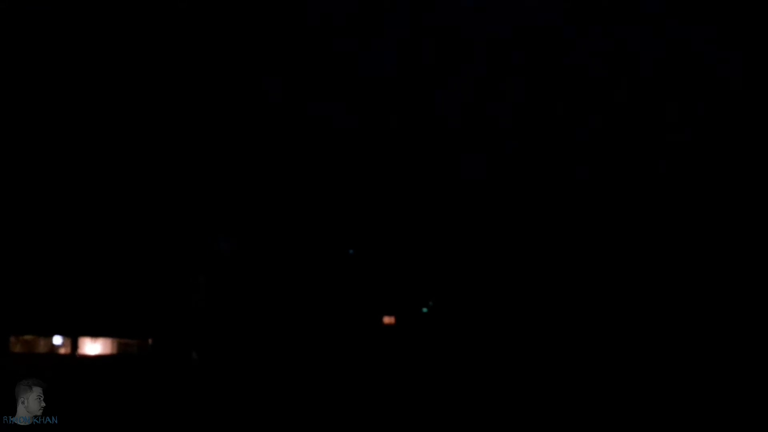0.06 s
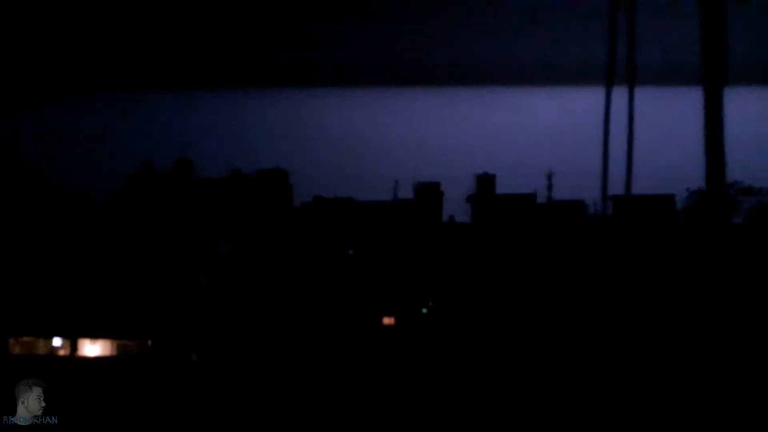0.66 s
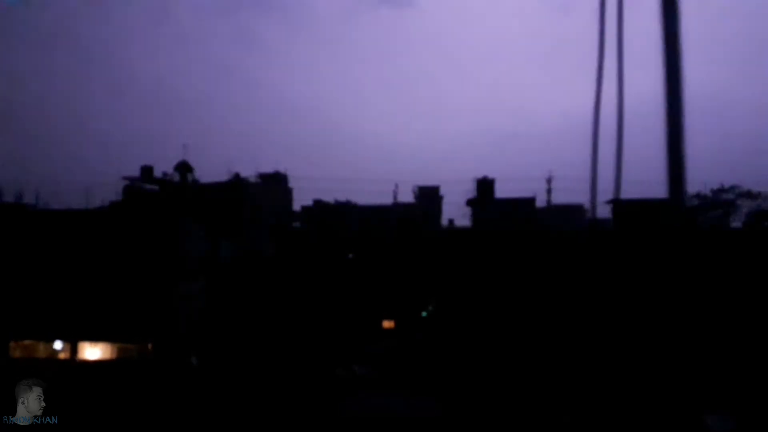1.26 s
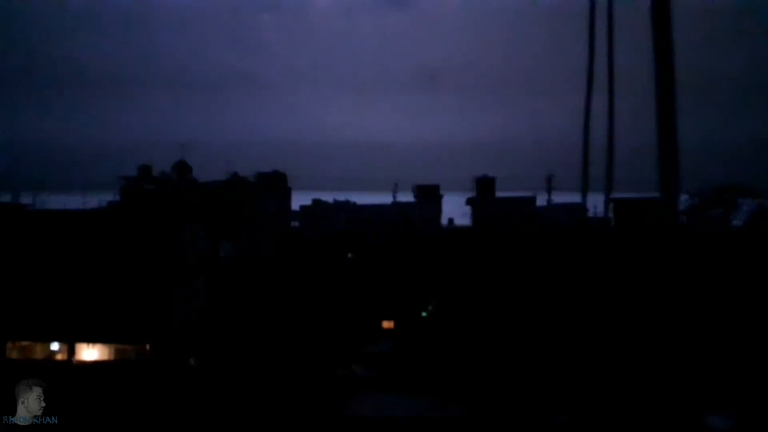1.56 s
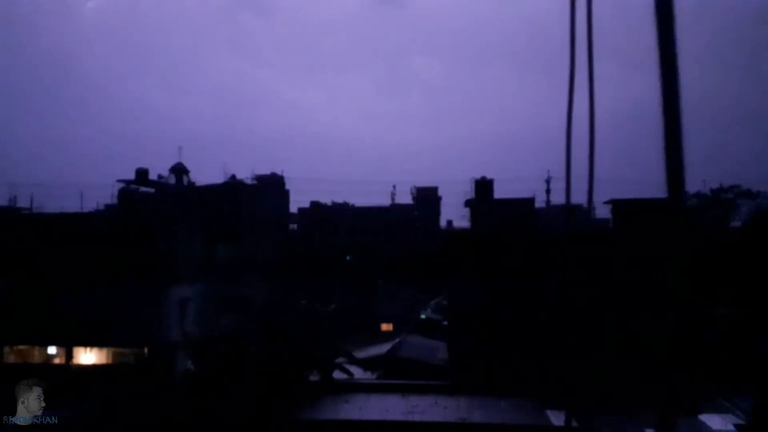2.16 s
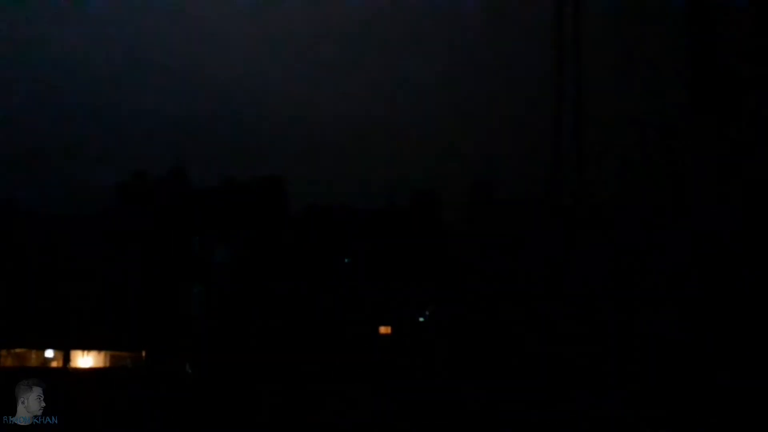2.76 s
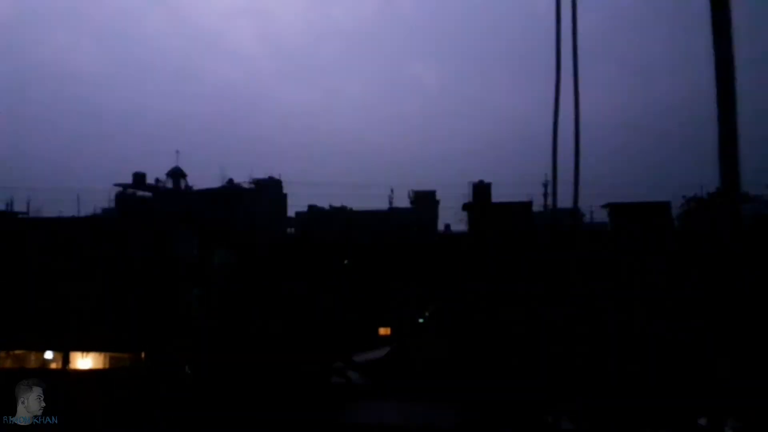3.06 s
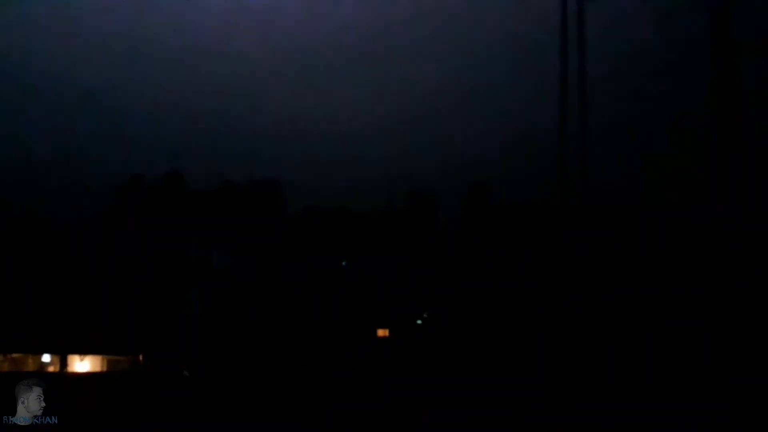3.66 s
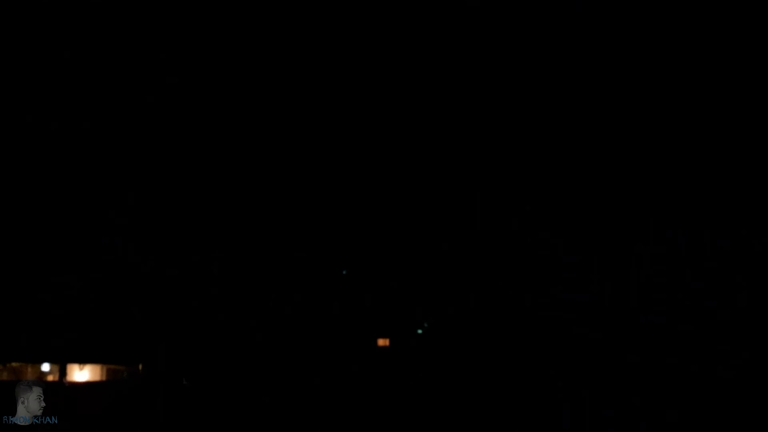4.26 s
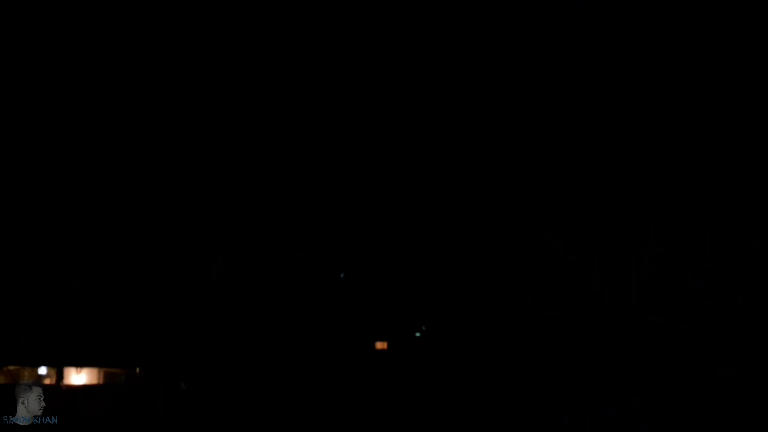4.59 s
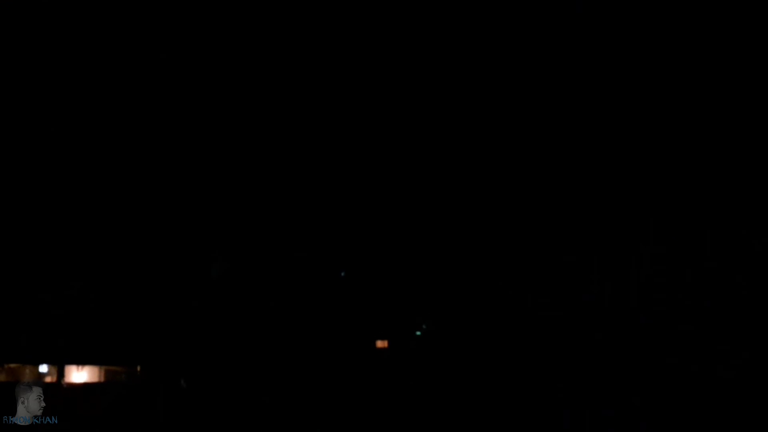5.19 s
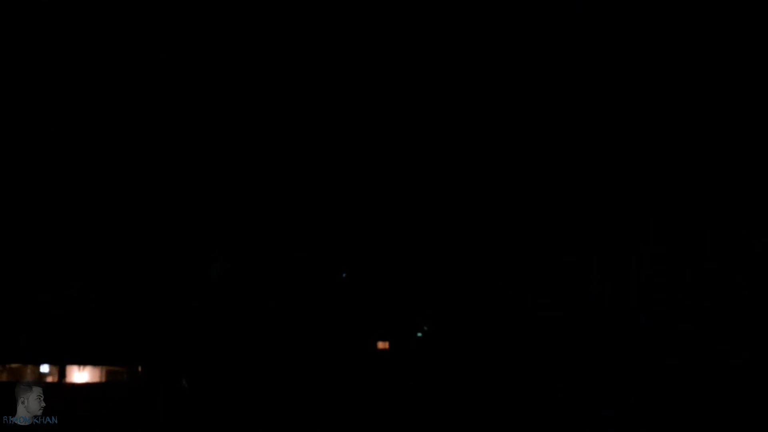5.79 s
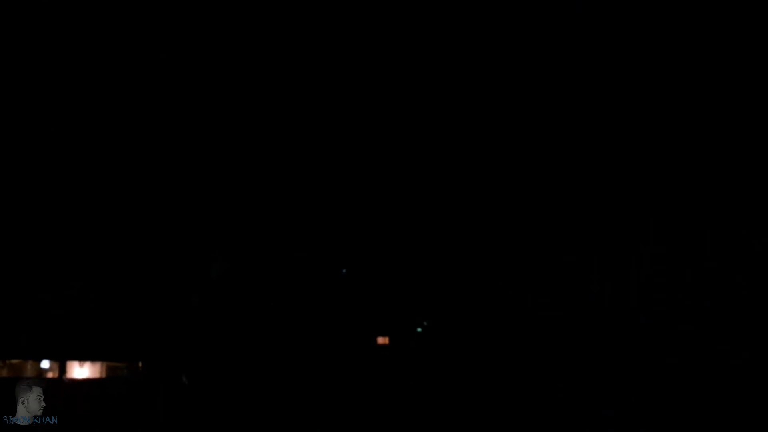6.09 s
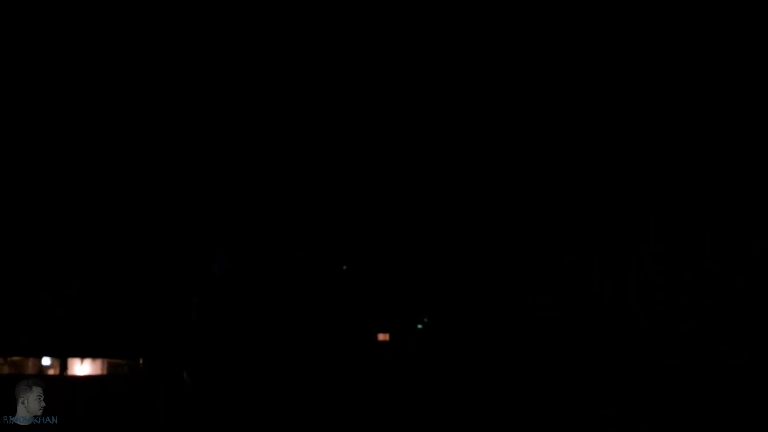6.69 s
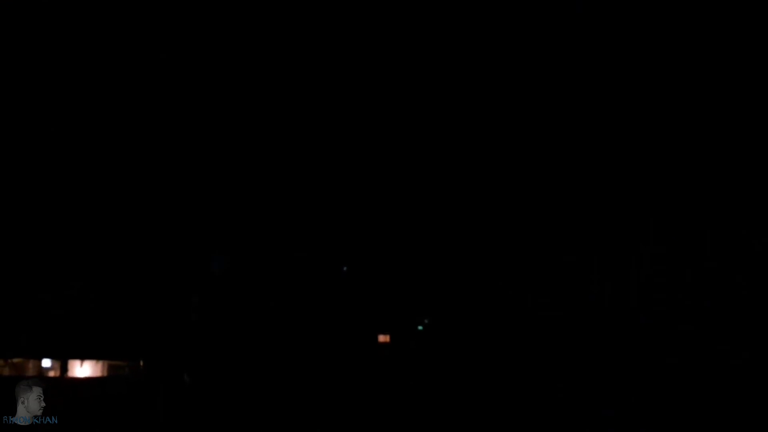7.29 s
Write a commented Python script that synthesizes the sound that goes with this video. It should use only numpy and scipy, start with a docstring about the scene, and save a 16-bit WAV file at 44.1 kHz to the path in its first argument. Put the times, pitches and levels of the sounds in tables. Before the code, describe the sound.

A faint, low murmur of a town at night opens the scene, with a small tick right at the start. At about 1 second close thunder begins as a tearing crackle full of sharp cracks. At 1.9 seconds the loudest clap hits, briefly overloading the small microphone with a rough fizz and a short dip in volume. Heavy booms and crackling follow densely until about 4 seconds, with quick, slightly hollow echoes off the houses. A thin, bright tick comes just before 4 seconds. The thunder then rolls on as a rumble with softer thuds, growing duller and clearly weaker after 6 seconds. At about 6.9 seconds a deep, steady hum sets in with hiss. Between 7 and 7.4 seconds come a few dry clicks, some hollow, the strongest near 7.2 seconds, and one very faint high peep.

```python
"""A town at night, where lightning strikes close to a small microphone that overloads.
Shock waves from the lightning's crooked path arrive as a tearing crackle, then as heavy booms and a
long roll, duller the further they have come. A limiter turns the sound down after the loudest booms.
There are short dry clicks and ticks, and two faint peeps. Near the end a deep hum sets in, with hiss."""
import sys
import numpy as np
from scipy import signal
from scipy.fft import rfft, irfft
from scipy.io import wavfile
from scipy.ndimage import uniform_filter1d

SR = 44100
rng = np.random.default_rng(int(sys.argv[2]) if len(sys.argv) > 2 else 0)


def write(x):
    x = np.atleast_2d(x).T
    wavfile.write(sys.argv[1], SR, np.round(np.clip(x, -1, 1) * 32767).astype(np.int16))

N = 323694
TIME = np.arange(N) / SR
THUNDER_START_S = .977

# Tone colours: how strong the low and high parts of a sound are.
# Each row: frequency in Hz, relative level in dB.
TOWN_TONE = [(20, -17), (60, 0), (110, 0.5), (200, -11.5), (400, -24.5), (900, -29.5), (1900, -29),
             (3200, -45), (5000, -54), (7000, -66), (10000, -50.5), (15000, -32)]
CLICK_TONE = [(100, -42), (600, 17), (1500, 9), (3300, 5.5), (5500, -8), (8500, -12), (10500, -0.5),
              (16000, 15.5)]
SHELL_PUSH_TONE = [(100, -16), (600, 3.5), (3300, 1.5), (4300, -6), (5000, -12), (16000, -39)]  # the push that sets a hollow shell ringing
CRACKLE_TONE = [(20, -29), (80, -10.5), (140, 5), (250, -4.5), (550, -2.5), (780, -5.5), (1100, -6.5),
                (1500, -7), (2000, -6.5), (2800, -13), (3750, -11), (4400, -19), (5200, -22), (7200, -47.5),
                (9000, -87.5)]
RUMBLE_TONE = [(15, -40), (40, -20), (80, -14.5), (130, 0.5), (190, -5.5), (270, -2), (380, -6), (600, -9),
               (800, -15), (1500, -26), (4000, -74)]
BOOM_TONE = [(15, -28), (50, -20), (90, -3.5), (140, -4), (250, -3), (360, 1), (600, -1), (800, -4.5),
             (1800, -1), (4000, -23), (8000, -53)]
SIDE_ECHO_TONE = [(60, -31), (130, -33), (260, -21), (550, -14.5), (1000, -12), (2000, -14), (4000, -12),
                  (6000, 5)]  # the part of the thunder that differs between left and right
HISS_TONE = [(20, -4), (60, -0.5), (110, 6.5), (220, -5), (320, -10.5), (500, -26), (850, -21), (1300, -24),
             (2200, -28), (4000, -38.5), (7000, -54), (8800, -44.5), (14500, -26), (16000, -33)]
MICROPHONE_TONE = [(20, -1.5), (4000, 0.5), (7000, 7), (9000, -2), (10500, -11), (16000, -24)]
# Short dry clicks and ticks; the one at 3.947 seconds is a thin, bright tick, like an edit splice.
# Each row: start in seconds, level in dB, snap pitch in Hz, left minus right in dB,
# hollow share from 0 to 1, amount of low knock from 0 to 1.
CLICKS_AND_TICKS = [(0.103, -19, 6600, 3, 0.1, 0.02), (3.947, -9.5, 10100, -1, 0, 0.2),
                    (7.0024, -7, 1750, -6.5, 0.92, 0.2), (7.2345, 1.5, 1880, -1.5, 0.93, 0),
                    (7.283, -15, 1180, -4, 0, 0.06), (7.3355, -8.5, 1360, -11.5, 0.6, 0.31)]
# The notes of the hollow shell that some clicks ring. Each row: pitch in Hz, width in Hz, level in dB.
SHELL_NOTES = [(650, 170, -2.5), (1330, 340, 4), (1990, 370, -0.5), (2830, 540, -2.5)]
# The roll swells and sinks as stretches of the lightning's path are heard in turn.
# Each row: time in seconds, then the relative levels of crackle, rumble and heave in dB.
ROLL_LEVELS = [(0.98, -32, -30.5, -56), (1.08, -32.5, -36.5, -53), (1.17, -29.5, -25, -53),
               (1.33, -25.5, -24.5, -46), (1.65, -29.5, -30.5, -50), (1.92, -25, -25.5, -23.5),
               (2.35, -21.5, -24.5, -32), (3.05, -23, -20.5, -43), (3.5, -24.5, -21.5, -50),
               (3.82, -26, -21, -39), (4.02, -29, -29, -62), (4.7, -29.5, -27, -43), (5.0, -32.5, -29, -37),
               (5.3, -29, -31.5, -45), (5.8, -30.5, -27.5, -42.5), (6.1, -31.5, -30.5, -44),
               (6.55, -41, -34.5, -44.5), (7.3, -43, -40.5, -52)]
# Short runs of evenly spaced shocks sound like notes. Each entry: pitch in Hz.
CRACKLE_NOTES = [1366, 1540, 1740, 1996, 2554]
# Sharp cracks from near kinks in the path. Each row: start in seconds, level in dB,
# ringing pitch in Hz, length in seconds, ringing share from 0 to 1.
KINK_CRACKS = [(0.999, -26.5, 1500, 0.025, 0.5), (1.092, -26, 1900, 0.024, 0),
               (1.1215, -18, 2120, 0.019, 0.24), (1.148, -18.5, 3900, 0.0016, 0.15),
               (1.1695, -18.5, 1580, 0.019, 1), (1.197, -23, 1920, 0.016, 0),
               (1.2615, -15, 910, 0.019, 0.37), (1.294, -17.5, 2220, 0.015, 0.85),
               (1.319, -22, 1540, 0.026, 0.1), (1.349, -24.5, 1780, 0.006, 0.02),
               (1.419, -31, 3730, 0.002, 1), (1.435, -20, 1580, 0.024, 0.7),
               (1.459, -18.5, 1510, 0.012, 0.4), (1.504, -23, 1350, 0.011, 0.4),
               (1.537, -22.5, 1930, 0.006, 0.3), (1.548, -18.5, 2950, 0.018, 0.07),
               (1.554, -19, 674, 0.016, 0.4), (1.586, -21, 2000, 0.006, 0.9),
               (1.656, -25, 2070, 0.013, 0.6), (1.709, -17, 1680, 0.012, 0.55),
               (1.729, -24.5, 1660, 0.012, 0.7), (1.761, -21.5, 710, 0.014, 0.3),
               (1.801, -19.5, 1600, 0.0065, 0), (1.834, -16, 1910, 0.017, 0.1),
               (1.865, -17.5, 1990, 0.018, 0.16), (1.887, -13, 1060, 0.005, 0.2),
               (1.899, -4, 1090, 0.037, 0.24), (1.949, -18, 900, 0.005, 0), (1.992, -19, 1090, 0.012, 0.7),
               (2.029, -16.5, 1700, 0.028, 0.3), (2.119, -20, 1450, 0.0086, 0.2),
               (2.19, -23, 1330, 0.014, 0.17), (2.207, -21.5, 1400, 0.007, 0.5),
               (2.236, -18, 1730, 0.021, 0.3), (2.267, -7.5, 1730, 0.013, 0.3),
               (2.299, -14.5, 1870, 0.016, 0.6), (2.35, -21.5, 1510, 0.008, 0.2),
               (2.368, -12.5, 1260, 0.014, 0.13), (2.386, -16, 760, 0.014, 0),
               (2.443, -16.5, 1150, 0.0087, 0.55), (2.458, -13, 675, 0.013, 0.2),
               (2.478, -18, 1930, 0.012, 0), (2.515, -16, 1630, 0.012, 0), (2.616, -18, 1820, 0.005, 0.23),
               (2.645, -20, 1900, 0.021, 0.2), (2.703, -20.5, 1430, 0.009, 0.2),
               (2.726, -17.5, 1330, 0.019, 0.6), (2.769, -24, 1500, 0.0044, 0.4),
               (2.8, -21.5, 1000, 0.0097, 0.3), (2.821, -24, 1360, 0.005, 0.5),
               (2.85, -17.5, 1480, 0.011, 0.3), (2.891, -17, 630, 0.021, 0.2),
               (2.938, -20.5, 1640, 0.02, 0.5), (2.968, -18.5, 1950, 0.0085, 0.3),
               (2.983, -18.5, 1860, 0.013, 0.1), (3.01, -20, 2060, 0.012, 0),
               (3.058, -15, 1720, 0.013, 0.01), (3.153, -15.5, 1360, 0.024, 0.2),
               (3.212, -20, 900, 0.013, 0.14), (3.295, -17.5, 804, 0.025, 0.4),
               (3.381, -28, 1400, 0.0048, 0.2), (3.462, -18.0, 1540, 0.018, 0.6),
               (3.53, -22.5, 1150, 0.012, 0.5), (3.576, -17.5, 1170, 0.015, 0.24),
               (3.694, -21.5, 710, 0.012, 0.5), (3.734, -23.5, 736, 0.0072, 0.6),
               (3.795, -26, 1570, 0.016, 0.4), (3.885, -32, 715, 0.015, 0.35),
               (4.075, -26.5, 1730, 0.0076, 0), (4.145, -25.5, 1600, 0.0047, 0.5),
               (4.34, -26, 1000, 0.005, 0.2), (4.548, -27.5, 1520, 0.0046, 0.9),
               (4.62, -26.5, 710, 0.028, 0.2), (4.701, -21.5, 704, 0.016, 0.5),
               (5.368, -29.5, 1390, 0.0066, 0.3), (5.549, -32, 1180, 0.012, 0.4),
               (6.017, -24.5, 1430, 0.03, 0)]
# Booms from stretches of the path that lie side-on to the listener.
# Each row: start in seconds, level in dB, pitch in Hz, length in seconds.
SIDE_ON_BOOMS = [(1.117, -17.5, 218, 0.02), (1.166, -25, 198.3, 0.03), (1.26, -16, 207, 0.015),
                 (1.316, -15.5, 265, 0.031), (1.538, -16.5, 224, 0.023), (1.57, -14, 212, 0.014),
                 (1.656, -24, 251, 0.023), (1.897, 1, 175, 0.026), (1.944, -5.5, 162, 0.005),
                 (1.987, -10.5, 178, 0.014), (2.028, -5, 200.5, 0.025), (2.091, -15, 270, 0.014),
                 (2.117, -9, 264, 0.0061), (2.136, -17.5, 255, 0.0052), (2.187, -15, 222, 0.0093),
                 (2.204, -11.5, 229, 0.0097), (2.246, -11, 227, 0.019), (2.352, -12, 238, 0.0079),
                 (2.368, -7.5, 273, 0.0096), (2.39, -25, 216, 0.011), (2.45, -12, 258, 0.0096),
                 (2.465, -9, 247, 0.014), (2.497, -20, 260, 0.007), (2.524, -0.5, 193.6, 0.0066),
                 (2.615, -11.5, 204, 0.0078), (2.647, -6, 214, 0.012), (2.708, -10.5, 219, 0.012),
                 (2.727, -10, 230, 0.024), (2.789, -7.5, 260, 0.025), (2.885, -9.5, 315, 0.017),
                 (2.925, -11.5, 223, 0.0092), (2.988, -16.5, 205, 0.018), (3.008, -14.5, 222, 0.014),
                 (3.056, -15.5, 242, 0.0075), (3.073, -4, 212, 0.015), (3.103, -19, 340, 0.012),
                 (3.122, -15.5, 223, 0.007), (3.166, -5.5, 227, 0.0076), (3.202, -6.5, 193, 0.028),
                 (3.223, -15.5, 204.3, 0.01), (3.256, -14.5, 228, 0.0059), (3.287, -11, 276, 0.02),
                 (3.314, -9.5, 158, 0.0091), (3.367, -11, 210, 0.027), (3.438, -20, 260, 0.018),
                 (3.473, -13, 234, 0.015), (3.527, -23, 236, 0.016), (3.576, -16.5, 258, 0.014),
                 (3.643, -14.5, 162, 0.015), (3.688, -8, 254, 0.028), (3.729, -6.5, 181, 0.0097),
                 (3.795, -8, 200, 0.011), (3.821, -9, 164, 0.014), (3.884, -6.5, 217, 0.023),
                 (3.948, -16.5, 224, 0.02), (4.078, -20, 195, 0.009), (4.104, -16.5, 250, 0.012),
                 (4.159, -18, 290, 0.015), (4.224, -18, 332, 0.033), (4.288, -17.5, 380, 0.04),
                 (4.343, -10.5, 239, 0.0082), (4.391, -23, 420, 0.023), (4.434, -16, 220, 0.011),
                 (4.547, -19, 261, 0.014), (4.618, -16.5, 265, 0.011), (4.709, -9, 152, 0.0098),
                 (4.799, -13, 160, 0.01), (5.073, -21, 184, 0.016), (5.198, -20, 256, 0.023),
                 (5.264, -17.5, 192, 0.022), (5.321, -19.5, 204, 0.01), (5.395, -17.5, 225, 0.014),
                 (5.487, -26, 198, 0.012), (5.637, -18, 162, 0.019), (5.713, -16.5, 193, 0.022),
                 (5.753, -15, 193, 0.01), (5.846, -17, 199, 0.036), (6.114, -21.5, 219, 0.012),
                 (6.135, -21, 223, 0.0096), (6.226, -28, 198, 0.0078), (6.384, -27, 278, 0.03),
                 (6.656, -25, 243.4, 0.033), (6.784, -22.5, 174, 0.014), (6.88, -12.5, 135, 0.015),
                 (6.912, -24, 169, 0.011)]
# Each crack and boom drags a trail of small shocks behind it.
# The entries: rise in seconds, hold in seconds, fade in dB per second.
TRAIL_SHAPE = (.004, .012, 520)
# A house wall returns more as the thunder comes from lower in the sky.
# Each row: time in seconds, echo share from 0 to 1.
WALL_SHARE = [(1, 0.33), (2.8, 0.04), (3.9, 0.39), (6.5, 0.57)]


def undb(db):
    """Turn decibels into a number to multiply by."""
    return 10 ** (np.asarray(db) / 20)


def level(x, db):
    """Set a sound's average (rms) level."""
    return x * undb(db) / np.sqrt(np.mean(x ** 2))


def burst(x, db):
    """Give a short sound as much energy as 10 ms at the given level."""
    return x * undb(db) * np.sqrt(SR / 100 / np.sum(x ** 2))


def curve(rows):
    """Join (seconds, value) rows with straight lines."""
    return np.interp(TIME, *np.transpose(rows))


def wander(rate):
    """A random value that drifts somewhere new rate times a second."""
    steps = rng.standard_normal(2048)
    return np.interp(TIME * rate, np.arange(len(steps)), steps)


def add(track, start_s, sound):
    """Mix a sound into a track from start_s on."""
    start = int(start_s * SR)
    part = sound[..., :N - start]
    track[..., start:start + part.shape[-1]] += part


def pulse(tone, size=4096):
    """A single tick with the given tone colour (an impulse response)."""
    hz, db = np.transpose(tone)
    log_hz = np.log(np.fft.rfftfreq(size, 1 / SR) + 1)
    log_gain = np.log(undb(np.interp(log_hz, np.log(hz), db)))
    cepstrum = irfft(log_gain)
    cepstrum[1:size // 2] *= 2  # folding this packs the energy at the start of the tick
    cepstrum[size // 2 + 1:] = 0
    return irfft(np.exp(rfft(cepstrum)))


def through(x, impulse):
    """Colour a sound by turning every sample into a copy of the impulse."""
    return signal.fftconvolve(x, impulse)[:len(x)]


def resonance(x, hz, q, passes=1):
    """Keep the sound near one pitch; a higher q (0.5 at least) rings longer."""
    band = signal.iirpeak(min(hz, SR / 4), max(q, .5), fs=SR)
    for _ in range(passes):
        x = signal.lfilter(*band, x)
    return x


def background(tone, db, wide_above_hz):
    """Softly wavering noise from all around; its low part is alike in both ears."""
    middle, side = (
        level(through(rng.standard_normal(N), pulse(tone)) * undb(.8 * wander(20)), db)
        for _ in range(2))
    side = signal.sosfilt(signal.butter(3, wide_above_hz, "high", fs=SR, output="sos"), side)
    return np.array([middle + side, middle - side])


def clicks():
    """Short dry clicks and ticks, a little different in each ear; some ring hollow or knock low."""
    out, tick, push = np.zeros((2, N)), pulse(CLICK_TONE), pulse(SHELL_PUSH_TONE)
    fade = undb(-60 * TIME[:len(tick)] / 0.06)
    knock = resonance(tick, 370, q=0.99, passes=2)
    shell = sum(undb(db) * resonance(push, hz, q=hz / width) for hz, width, db in SHELL_NOTES)
    for start_s, db, hz, pan_db, hollow, body in CLICKS_AND_TICKS:
        snap = resonance(tick, hz, q=0.72)
        click = (1 - hollow) * snap / np.abs(snap).max() + hollow * shell / np.abs(shell).max()
        tails = np.array([through(fade * rng.standard_normal(len(fade)), click) for _ in range(2)])
        ears = click + 0.02 * tails + body * knock / np.abs(knock).max()
        add(out, start_s, ears * undb(db + np.array([[pan_db], [-pan_db]]) / 2))
    return out


def peep(start_s, length_s, hz, db):
    """A faint, unsteady whistle that dips in pitch and rises again."""
    arch = np.sin(np.pi * np.clip((TIME - start_s) / length_s, 0, 1))
    pitch = hz * (1 - 0.065 * arch + 0.004 * wander(120))
    loudness = undb(db + 1.5 * wander(66)) * np.minimum(3 * arch, 1)
    return loudness * np.sin(2 * np.pi * np.cumsum(pitch) / SR)


def shocks(rate, spread_db, bunch_db, bunch_rate):
    """About rate shocks a second, uneven in size, with the strong ones coming in bunches."""
    arrives = rng.random(N) < rate / SR
    size = undb(spread_db * np.minimum(rng.exponential(size=N), 4) + bunch_db * wander(bunch_rate))
    train = arrives * size * rng.choice([-1, 1], N)
    return train / np.sqrt(uniform_filter1d(train ** 2, size=3500) + 1e-9)  # even out slow swells


def crackle(rate, ring_db):
    """Small shocks make a tearing sound, with a few notes ringing among them."""
    tearing = shocks(rate, spread_db=2.0, bunch_db=2.0, bunch_rate=96)
    rings = sum(resonance(shocks(rate=220, spread_db=1.5, bunch_db=6.0, bunch_rate=27), hz, q=10.5)
                for hz in CRACKLE_NOTES)
    return through(tearing + undb(ring_db) * rings, pulse(CRACKLE_TONE))


def trail(events, rise_s, hold_s, fade_db_per_s):
    """A loudness curve that jumps up at each event, holds and dies away."""
    power, t = np.zeros(N), TIME[:SR // 2]
    shape = np.minimum(t / rise_s, 1) * undb(-fade_db_per_s * np.maximum(t - rise_s - hold_s, 0))
    for start_s, db, *_ in events:
        add(power, start_s, (undb(db) * shape) ** 2)
    return np.sqrt(power)


def roll():
    """Countless small shocks crackle; longer ones merge into rumble and a slow heave of the air."""
    arrived = np.clip((TIME - THUNDER_START_S) / 0.0096, 0, 1)
    rumble = through(shocks(rate=1400, spread_db=2.5, bunch_db=5.0, bunch_rate=30), pulse(RUMBLE_TONE))
    shoves = shocks(rate=600, spread_db=16.0, bunch_db=8.5, bunch_rate=28)
    heave = resonance(shoves, 61, q=1.4, passes=2)
    crackle_gain, rumble_gain, heave_gain = (
        undb(curve(np.array(ROLL_LEVELS)[:, [0, column]])) for column in (1, 2, 3))
    # Extra crackle follows every crack and boom; extra heave follows every boom.
    after_cracks = undb(-10.5) * trail(KINK_CRACKS, *TRAIL_SHAPE)
    after_booms = undb(-27.5) * trail(SIDE_ON_BOOMS, *TRAIL_SHAPE)
    boom_heave = undb(-22) * trail(SIDE_ON_BOOMS, rise_s=0.0043, hold_s=0.012, fade_db_per_s=240)
    return arrived * (level(crackle(rate=3000, ring_db=3.5), -0.4) * crackle_gain
                      + level(crackle(rate=1500, ring_db=2.0), 5.0) * np.hypot(after_cracks, after_booms)
                      + level(rumble, -1.5) * rumble_gain
                      + level(heave, 3.0) * np.hypot(heave_gain, boom_heave))


def volley(length_s, fade, count, scatter, size=4096):
    """A fading run of shocks, evenly spaced (scatter 0) or irregular (scatter 1)."""
    place, strength = rng.random((2, count))
    order = np.arange(count)
    progress = (order + scatter * place * (order > 0)) / count
    samples = np.minimum(progress * length_s * SR, size - 1).astype(int)
    train = np.zeros(size)
    np.add.at(train, samples, (.5 + strength) * np.exp(-fade * progress))
    return train


def cracks():
    """Runs of very short shocks, separate at first and denser later; some ring at their own pitch."""
    out, tick = np.zeros(N), pulse(CRACKLE_TONE)
    for start_s, db, hz, length_s, ringing in KINK_CRACKS:
        spacing_s = np.interp(start_s, (1.3, 2.2), (.0065, .0028))
        scatter = np.interp(start_s, (1.3, 2.2), (.2, 1))
        count = max(1, round(length_s / spacing_s))
        fronts = through(-volley(length_s, fade=0.46, count=count, scatter=scatter), tick)
        snap = 0.32 * fronts + resonance(fronts, 1670, q=2.2)
        ring = resonance(fronts, hz, q=2.4, passes=2)
        crack = np.sqrt(1 - ringing) * level(snap, 0) + np.sqrt(ringing) * level(ring, 0)
        add(out, start_s, burst(crack, db))
    return out


def booms():
    """Each boom is a run of N-shaped pressure waves: a round body with steep, spitting fronts."""
    out, thud, spit = np.zeros(N), pulse(BOOM_TONE), pulse(CRACKLE_TONE)
    for start_s, db, hz, length_s in SIDE_ON_BOOMS:
        n_wave = np.linspace(1, -1, int(.8 * SR / hz))
        arrivals = volley(length_s, fade=0.21, count=2 + int(length_s * hz / 2), scatter=0.712)
        waves = through(arrivals, n_wave)
        body = 0.61 * (hz / 220) ** 2 * waves + resonance(waves, hz, q=0.85)  # deeper booms are rounder
        fronts = resonance(through(arrivals, spit), 3600, q=0.5)
        add(out, start_s, burst(through(body, thud), db) + burst(fronts, db - 18.5))
    return out


def wall_echo(x, delay_s):
    """The house wall behind the microphone returns the low sound a moment later, making it hollow."""
    lows = signal.sosfiltfilt(signal.butter(2, 850, fs=SR, output="sos"), x)
    return x + curve(WALL_SHARE) * np.interp(TIME - delay_s, TIME, lows, left=0)


def air_dulling(x):
    """Later thunder has crossed more air, which soaks up more of the treble above 1.4 kHz."""
    hz, seconds, frames = signal.stft(x, SR, nperseg=512)
    khz = hz[:, None] / 1000
    loss_db_per_s = 1.44 * (khz ** 1.22 - np.minimum(khz, 1.4) ** 1.22)
    extra_travel_s = np.maximum(seconds - THUNDER_START_S, 0)
    return signal.istft(frames * undb(-loss_db_per_s * extra_travel_s), SR)[1][:N]


def side_echoes(x):
    """Scattered echoes off house fronts swell and die quickly, making left and right differ."""
    t = TIME[:SR // 8]
    tail = rng.standard_normal(len(t)) * t * np.exp(-t / .007)
    echoes = through(x, tail / np.linalg.norm(tail))
    side = through(echoes, pulse(SIDE_ECHO_TONE))
    return np.array([x + side, x - side])


def limiter(x, limit_db, attack_s, release_s):
    """The volume drops quickly at a loud peak and creeps back."""
    excess = np.log(np.maximum(np.abs(x).max(axis=0) / undb(limit_db), 1))
    held = np.maximum.accumulate(excess + TIME / release_s) - TIME / release_s
    smoothing = np.exp(-1 / (attack_s * SR))
    return x * np.exp(-signal.lfilter([1 - smoothing], [1, -smoothing], held))


def rasp(x, overload_db):
    """A ragged fizz that lasts as long as the sound drives the microphone too hard."""
    excess = np.clip(np.abs(x).mean(axis=0) / undb(overload_db) - 1, 0, 1)
    drive = np.sqrt(np.maximum(uniform_filter1d(excess, size=260), 0))
    return undb(-27.5) * resonance(drive * rng.standard_normal(x.shape), 6840, q=0.5, passes=2)


def hum(start_s, hz):
    """A deep, steady hum that sets in together with a hiss."""
    fade_in = np.clip((TIME - start_s) / 0.015, 0, 1)
    tone = level(np.sin(2 * np.pi * hz * (TIME - start_s)), -32.0)
    return fade_in * (tone + background(HISS_TONE, db=-28.5, wide_above_hz=380))


def scene():
    """Thunder and its echoes over the town's murmur, the clicks, the peeps and the late hum."""
    town = background(TOWN_TONE, db=-45.0, wide_above_hz=450)
    peeps = peep(start_s=.871, length_s=.011, hz=3150, db=-65)
    peeps += peep(start_s=7.098, length_s=.105, hz=4190, db=-58.5)
    other_sounds = town + hum(start_s=6.86, hz=27.7) + clicks() + peeps
    thunder = wall_echo(roll() + cracks() + booms(), delay_s=0.00792)
    return side_echoes(air_dulling(thunder)) + other_sounds


def record(dry):
    """A limiter holds the booms down, the fastest peaks still overload, and the top treble is cut."""
    driven = dry * undb(0.93)
    held = limiter(driven, limit_db=0.5, attack_s=0.00099, release_s=0.098)
    ceiling, hardness = undb(2.5), 6.5
    rounded = held / (1 + np.abs(held / ceiling) ** hardness) ** (1 / hardness)
    overloaded = rounded + rasp(driven, overload_db=-0.5)
    heard = through(overloaded.T, pulse(MICROPHONE_TONE)[:, None]).T
    return signal.sosfilt(signal.ellip(8, .2, 70, 15900, fs=SR, output="sos"), heard)


dry = scene()
out = record(dry)
write(out)
```